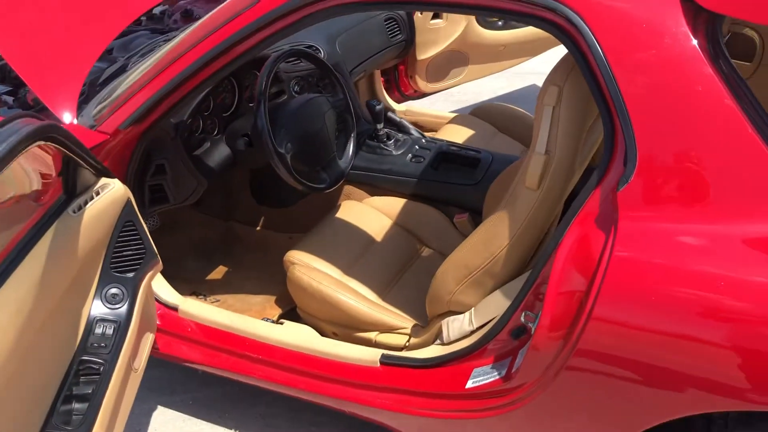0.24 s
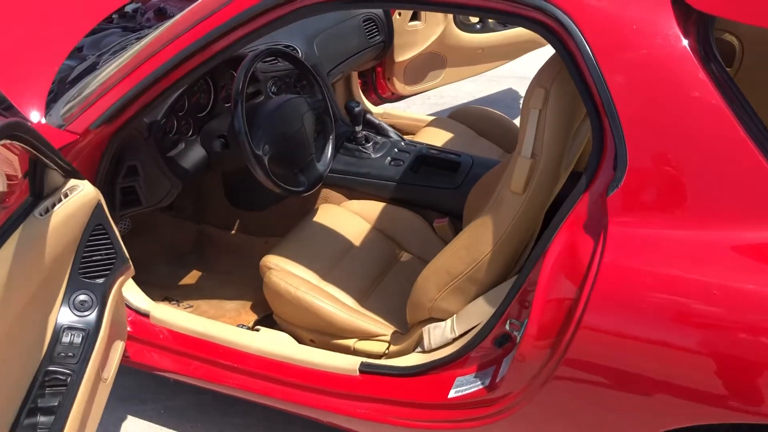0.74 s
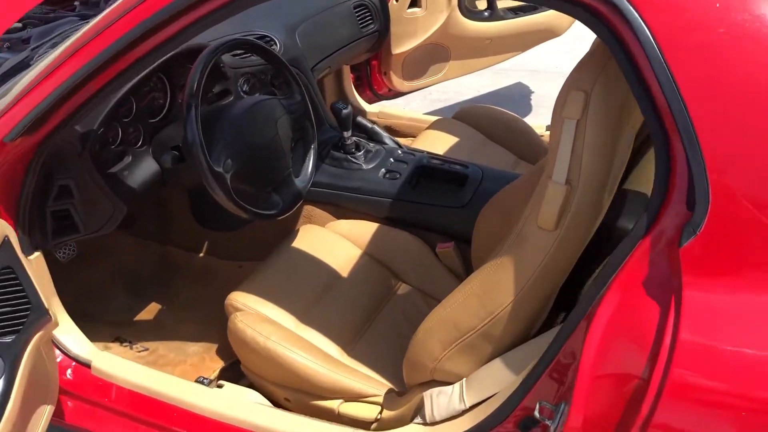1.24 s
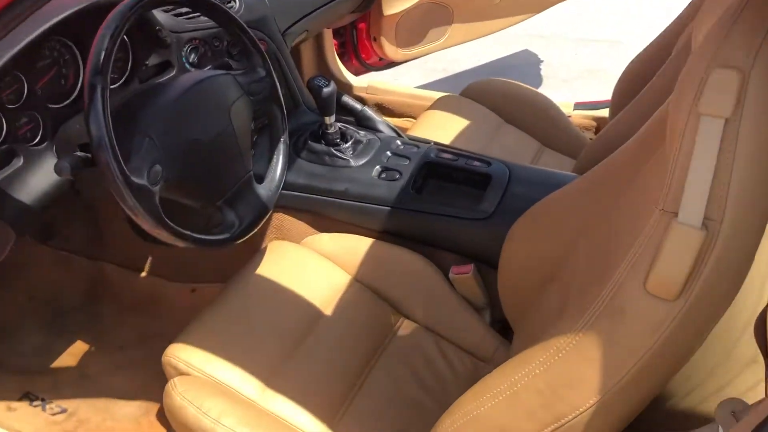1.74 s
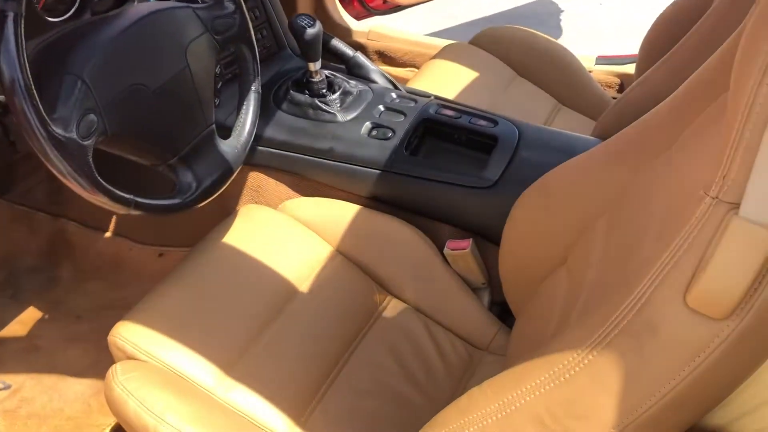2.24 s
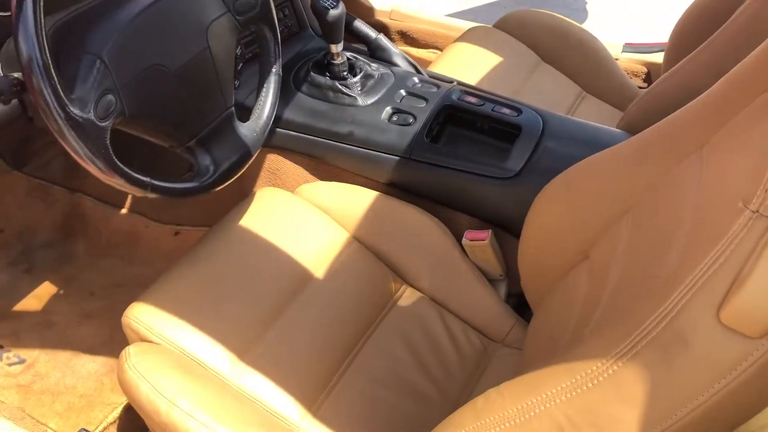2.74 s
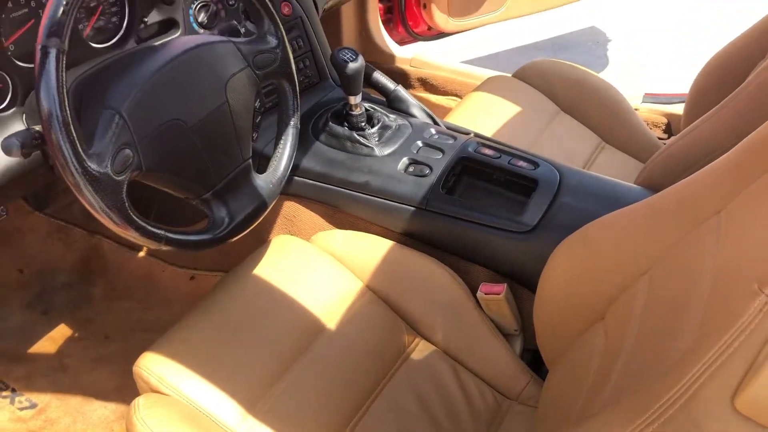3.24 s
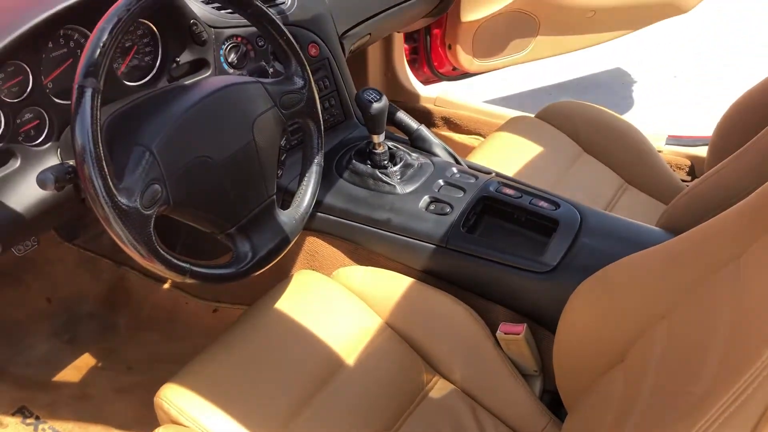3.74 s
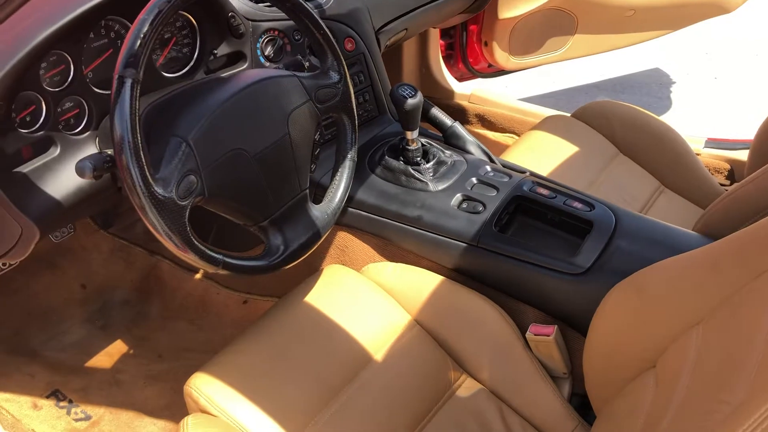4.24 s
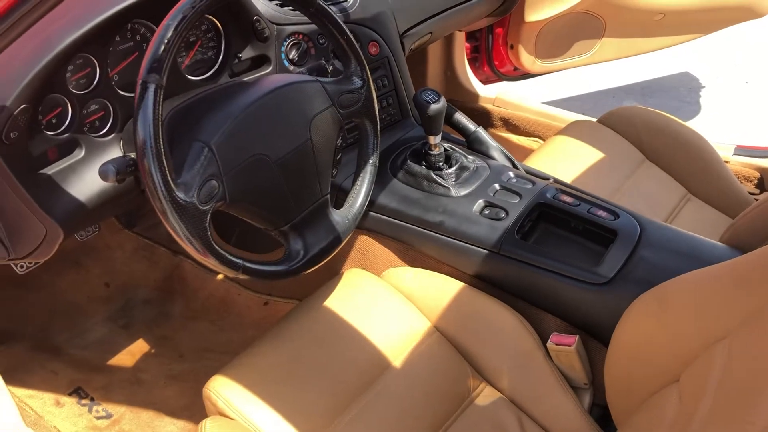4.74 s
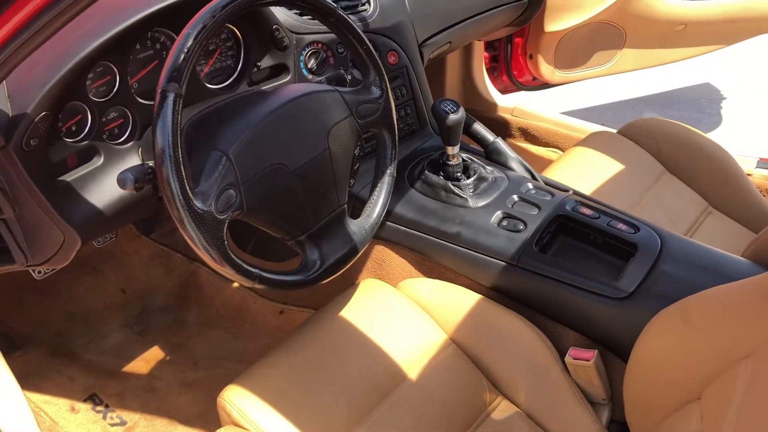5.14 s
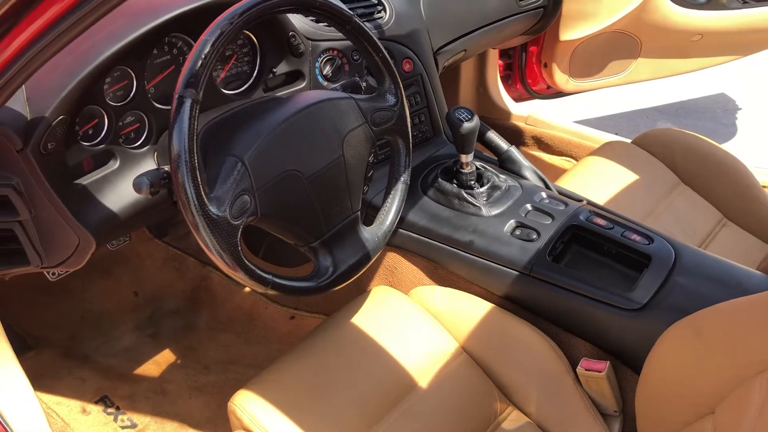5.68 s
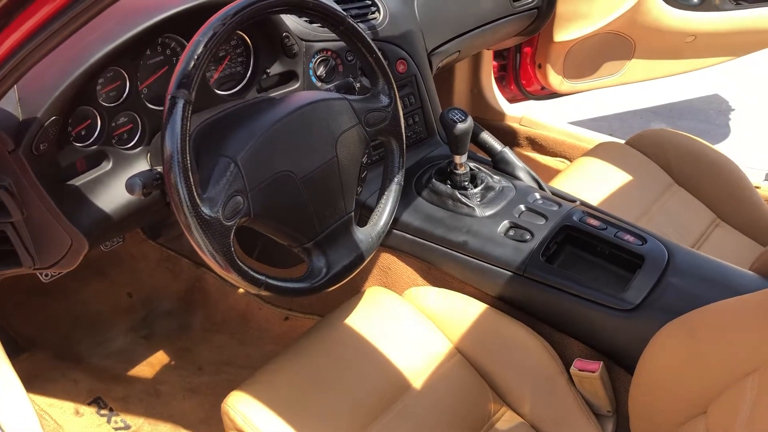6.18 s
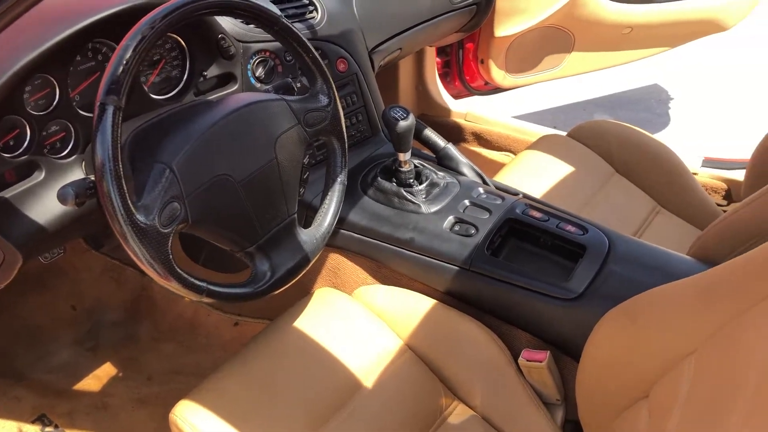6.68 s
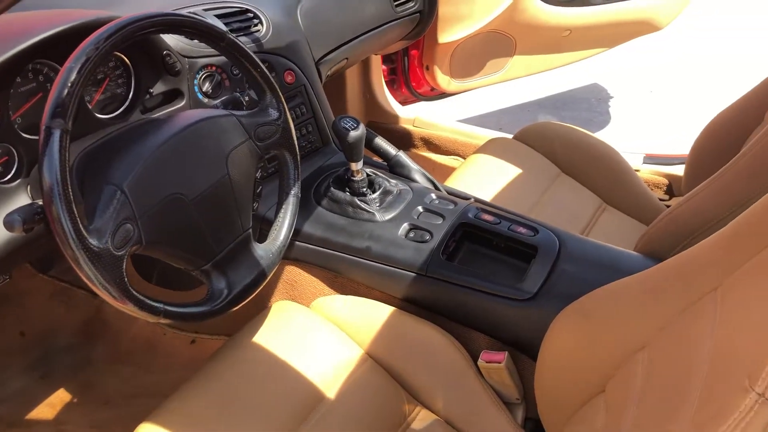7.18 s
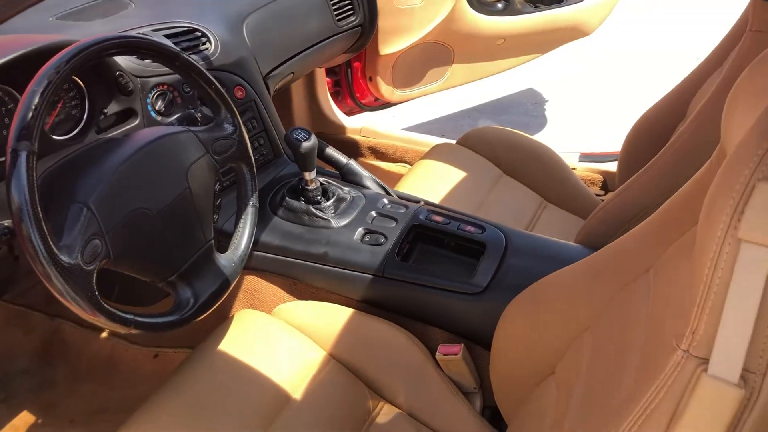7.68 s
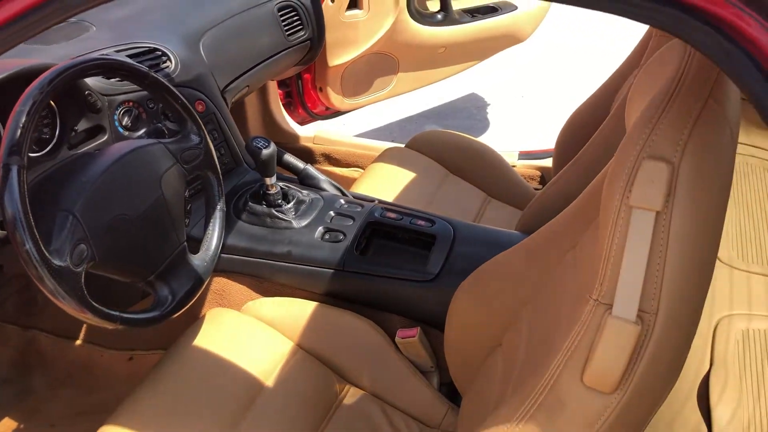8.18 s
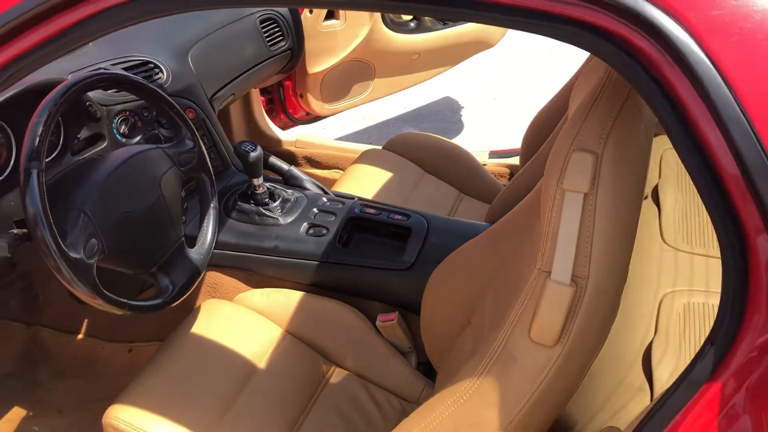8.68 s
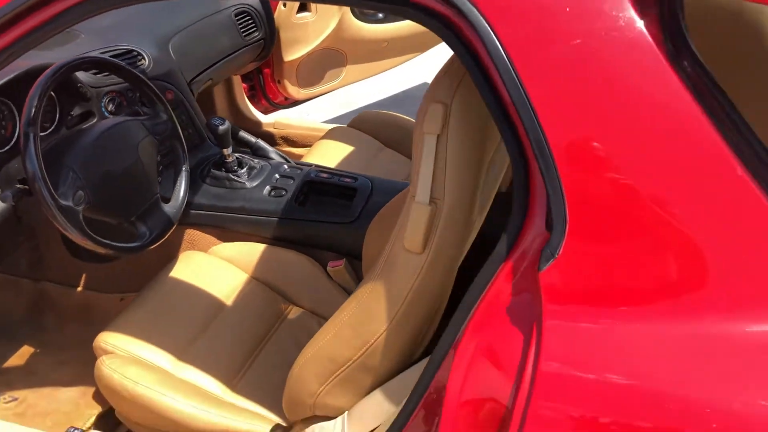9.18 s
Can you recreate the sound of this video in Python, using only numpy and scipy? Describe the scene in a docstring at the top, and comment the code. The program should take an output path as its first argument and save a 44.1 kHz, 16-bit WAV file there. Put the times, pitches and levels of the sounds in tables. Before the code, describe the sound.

A sports car engine idles with a steady low drone, heard at the open door and inside, with soft handling knocks.

```python
"""A two-rotor car engine idles throughout, heard at the open driver's door: exhaust pulses drone,
the engine bay whirrs, injectors tick, a fuel pump whines faintly. Cloth swishes and soft handling
knocks begin at once. A far bird chirps three times from 1.1 s, as the listener leans into the cabin:
more boom, less hiss. The knocks peak near 3.2 s. From 7.9 s the listener backs out, cloth swishes
again and the pump's whine swells at 9 s."""
import sys
import numpy as np
from scipy import signal
from scipy.fft import rfft, irfft
from scipy.io import wavfile

SR = 44100
rng = np.random.default_rng(int(sys.argv[2]) if len(sys.argv) > 2 else 0)


def wav_record(signal):
    """Record a signal, one row per channel, as 16-bit PCM in the file named by sys.argv[1]."""
    frames = np.transpose(np.atleast_2d(signal))
    bounded = np.clip(frames, -1, 1)
    # unit amplitude maps onto the largest positive 16-bit level
    quanta = np.round(bounded * 32767).astype(np.int16)
    wavfile.write(sys.argv[1], SR, quanta)


N = 415422
T = np.arange(N) / SR

# listener's path: time_s, position (0 in the cabin, 1 outside)
POSITION = [(0, 0.89), (1.2, 0.83), (2.15, .12), (3.3, 0), (7.9, .03), (8.5, .38), (9.42, 0.59)]


def amp(db):
    """Decibels to gain."""
    return 10 ** (np.asarray(db) / 20)


def unit(x):
    """Scale to rms 1."""
    return x / np.sqrt(np.mean(x ** 2) + 1e-20)


def curve(rows):
    """Linear track through (time_s, value) rows."""
    return np.interp(T, *np.transpose(rows))


def colour(spectrum, hz):
    """Gain at hz from (freq_hz, level_db) rows."""
    freq_hz, level_db = np.transpose(spectrum)
    return amp(np.interp(np.log(hz + 1), np.log(freq_hz), level_db))


def noise(spectrum):
    """Coloured noise, rms 1, rolled off past the table's ends."""
    hz = np.fft.rfftfreq(N, 1 / SR)
    low_pass = 1 / (1 + (hz / spectrum[-1][0] / 2) ** 4)
    high_pass = hz / (hz + spectrum[0][0] / 2)
    return unit(irfft(rfft(rng.standard_normal(N)) * colour(spectrum, hz) * low_pass * high_pass, N))


def resonate(x, hz, width_hz):
    """Movable resonance, rms 1: shift to 0 Hz, smooth twice, shift back."""
    phase = 2 * np.pi * np.cumsum(hz * np.ones(len(x))) / SR
    carrier = np.exp(1j * phase)
    pole = np.exp(-np.pi * width_hz * np.sqrt(2) / SR)
    smoothed = signal.lfilter([1], [1, -2 * pole, pole * pole], x * carrier.conj())
    return unit((carrier * smoothed).real)


def wander(rate_hz):
    """Smooth random drift, rms 1."""
    size = 4096
    hz = np.fft.rfftfreq(size, N / SR / size)
    slow = irfft(rfft(rng.standard_normal(size)) * np.exp(-(hz / rate_hz) ** 2), size)
    return np.interp(T, np.linspace(0, N / SR, size), unit(slow))


def add(mix, start_s, sound):
    """Mix a sound in at start_s."""
    part = mix[max(round(start_s * SR), 0):][:len(sound)]
    part += sound[:len(part)]


def level(inside_db, outside_change_db):
    """Gain along the listener's path."""
    return amp(inside_db + outside_change_db * curve(POSITION))


def reflections(x, count=14, echo_gain=0.072, longest_s=.014):
    """Early echoes off glass, door and ground ripple the treble."""
    delays = ((.001 + rng.random(count) * longest_s) * SR).astype(int)
    echoes = sum((-1) ** k * np.pad(x, (delay, 0))[:N] for k, delay in enumerate(delays))
    return (x + echo_gain * echoes) / np.sqrt(1 + count * echo_gain ** 2)


def bird(blur=0.18):
    """Far calls, blurred on the way: a falling whistle, then a short arched note."""
    # calls: start_s, level_db
    calls = [(1.125, -60), (1.31, -61), (1.542, -58)]
    # pitch track of each note: offset_s, pitch_hz
    notes = [
        [(0, 3130), (.028, 2960), (.05, 2680), (.08, 2480)],
        [(.076, 3220), (.095, 3400), (.12, 3130)],
    ]
    out = np.zeros(N)
    for start_s, level_db in calls:
        for note in notes:
            offset_s, pitch_hz = np.transpose(note)
            t = np.arange(offset_s[0], offset_s[-1], 1 / SR)
            phase = 2 * np.pi * np.cumsum(np.interp(t, offset_s, pitch_hz)) / SR
            whistle = unit(np.sin(phase)) * signal.windows.tukey(len(t), .5)
            add(out, start_s + offset_s[0], amp(level_db) * whistle)
    return out * (1 + blur * wander(rate_hz=90))


def swishes():
    """Sliding cloth; its colour glides with the speed of the rub."""
    # rubs: start_s, length_s, level_db, start_hz, end_hz, width_hz
    rubs = [(0.009, 0.042, -45.5, 4960, 3980, 4480), (8.77, 0.095, -52, 8000, 5000, 3800),
            (8.81, 0.059, -50.5, 3500, 3400, 450), (9.196, 0.096, -51, 3200, 4000, 4500)]
    out = np.zeros(N)
    for start_s, length_s, level_db, start_hz, end_hz, width_hz in rubs:
        size = int(length_s * SR)
        rub = resonate(rng.standard_normal(size), np.linspace(start_hz, end_hz, size), width_hz)
        add(out, start_s, amp(level_db) * rub * np.hanning(size))
    return out


def grip_shifts(rate_hz=1.5, level_db=-33.5, spread_db=1, hardness_db=-15):
    """Faint random bumps of the grip, as rows for knocks()."""
    draws = rng.random((int(rate_hz * N / SR), 2))
    return [(when * N / SR, level_db + spread_db * (2 * force - 1), hardness_db) for when, force in draws]


def knocks(thud_db=-1, push_db=-8, casing_db=-1, cutoff_hz=800):
    """Soft blows give a thud and a deep push; harder ones ring the casing more."""
    # handling blows: start_s, level_db, hardness_db
    blows = [(0.002, -14.5, -28), (0.027, -18.5, -17), (0.094, -25, -26), (0.467, -22.5, -5),
             (0.477, -14.5, -14), (0.56, -31, -5), (1.537, -23, -17), (1.786, -23.5, -20),
             (1.81, -24.5, -16.5), (2.052, -32, -9), (2.126, -24, -16), (2.139, -33, -7),
             (2.378, -19.5, -24), (2.845, -22.5, -19), (2.868, -25.5, -9.5), (2.882, -25.5, -14),
             (3.15, -18, -18), (3.186, -27.5, -0.5), (3.192, -15, -12), (3.211, -22, -14.5),
             (3.229, -13, -11.5), (3.277, -29, -8), (3.308, -19, -14), (4.453, -20, -23), (4.543, -24, -18),
             (4.733, -22.5, -17.5), (5.917, -21.5, -14), (5.96, -21.5, -14), (6.265, -23.5, -17),
             (6.293, -22.5, -18), (6.696, -29, -9), (6.725, -22.5, -19), (7.122, -21.5, -25),
             (7.369, -22.5, -25.5), (8.526, -26.5, -26), (8.692, -25.5, -16.5), (8.937, -25.5, -12)]
    # casing modes: pitch_hz, level_db, decay_s
    modes = [(275.5, 8, 0.0037), (408, 5.5, 0.0027), (596, -0.5, 0.0015)]
    out = np.zeros(N)
    t = np.arange(SR // 10) / SR

    def ring(hz, decay_s):
        """Damped tone, soft onset."""
        return t / decay_s * np.exp(1 - t / decay_s) * np.sin(2 * np.pi * hz * t)

    thud = amp(thud_db) * ring(hz=175, decay_s=0.0036)
    push = amp(push_db) * ring(hz=118, decay_s=0.0041)
    for start_s, level_db, hardness_db in blows + grip_shifts():
        detunes = 1 + 0.1 * rng.standard_normal(len(modes))  # the grip shifts the modes
        casing = sum(amp(db) * ring(hz * detune, decay_s)
                     for (hz, db, decay_s), detune in zip(modes, detunes))
        knock = thud + push + amp(hardness_db + casing_db) * casing
        add(out, start_s - .001, amp(level_db) * knock)
    # soft fingers excite no treble
    return signal.sosfilt(signal.butter(4, cutoff_hz, fs=SR, output="sos"), out)


def fuel_pump(waver=0.0007, flutter_db=1.2, swell_at_s=9.02, swell_half_s=.085):
    """Thin whine of a small electric motor, swelling once."""
    # motor tones: pitch_hz, relative_db
    tones = [(2320, -5), (2680, -13)]
    clock_s = np.cumsum(1 + waver * wander(rate_hz=10.4)) / SR
    whine = unit(sum(amp(db) * np.sin(2 * np.pi * hz * clock_s) for hz, db in tones))
    swell = 1 + amp(16.5) / (1 + ((T - swell_at_s) / swell_half_s) ** 2)
    flutter = amp(flutter_db * wander(rate_hz=15))
    return whine * level(inside_db=-73, outside_change_db=-4) * swell * flutter


def burst(firings, start, rise, fall):
    """Envelope repeating every second firing; all times in firings."""
    age = (firings - start) % 2
    return (1 - np.exp(-age / rise)) * np.exp(-age / fall)


def injectors(firings, sway_db=0.9):
    """A high, soft tick every second firing, louder outside."""
    # injector modes: pitch_hz, width_hz, relative_db, lag_firings
    modes = [(9200, 1900, -70, 0.031), (10860, 600, -81, .1), (11800, 600, -76, 0.083),
             (13550, 450, -78, 0.12), (14900, 600, -80, 0.1)]
    gain = level(inside_db=-1, outside_change_db=6.5) * amp(sway_db * wander(rate_hz=7.5))
    grit = rng.standard_normal(N)
    ticks = np.zeros(N)
    for pitch_hz, width_hz, relative_db, lag_firings in modes:
        envelope = burst(firings, start=0.64 + lag_firings, rise=0.18, fall=0.2)
        ticks += amp(relative_db) * resonate(grit * envelope, pitch_hz, width_hz)
    return gain * reflections(ticks, echo_gain=0.18, longest_s=.01)


def belt_hum(firings, slip_cycles=0.13, sway_db=2.5):
    """Pulleys turn with the engine; their tones waver as the belt slips."""
    # pulley tones: cycles_per_firing, level_db
    tones = [(11.5, -60), (17.5, -60.5), (25, -61.5)]
    out = np.zeros(N)
    for cycles_per_firing, level_db in tones:
        gain = amp(level_db + sway_db * wander(rate_hz=1.7))
        cycles = cycles_per_firing * firings + slip_cycles * wander(rate_hz=15)
        out += gain * unit(np.sin(2 * np.pi * cycles))
    return out


def engine_bay(firings, whirr_sway_db=0.57, throb_db=1.4, flicker_db=0.84, outside_share=0.87):
    """Belts and fans whirr, panels resonate, the intake hiss throbs with each firing."""
    # whirr spectrum: freq_hz, density_db
    whirr_spectrum = [(120, -31), (200, -6), (297, -6.5), (315, -14), (341, -10.5), (447, -6.5), (574, -5),
                      (621, -7), (696, -7.5), (753, -7), (1110, -6.5), (1930, -18), (2340, -21),
                      (3000, -28), (3900, -33.5), (6600, -120)]
    # engine cover and cabin modes: pitch_hz, width_hz, outside_db, inside_db
    modes = [(286.8, 42, -57, -54), (373, 53, -48, -73), (647, 13, -57, -61.5), (852, 59, -70, -59),
             (984, 100, -76, -58), (1351, 61, -61, -62), (1544, 194, -52, -62.5), (5760, 82, -70, -83),
             (5120, 210, -74, -83)]
    # intake spectrum: freq_hz, density_db
    hiss_spectrum = [(1500, -6), (2800, 1.5), (3700, 2.5), (4500, 1.5), (5400, 1), (7000, -2.5), (9000, -5),
                     (12000, -8), (14500, -11.5), (16000, -12)]
    whirr = noise(whirr_spectrum) * level(inside_db=-46, outside_change_db=2.16)
    whirr *= amp(whirr_sway_db * wander(rate_hz=18))
    panels = np.zeros(N)
    for pitch_hz, width_hz, outside_db, inside_db in modes:
        gain = level(inside_db, outside_share * (outside_db - inside_db))
        panels += gain * resonate(rng.standard_normal(N), pitch_hz, width_hz)
    throb = np.cos(2 * np.pi * (firings - .25))
    hiss = noise(hiss_spectrum) * level(inside_db=-59, outside_change_db=5.5)
    hiss *= amp(throb_db * throb + flicker_db * wander(rate_hz=32))
    return whirr + panels + reflections(hiss)


def dips_db():
    """Brief dips and swells in the drone's level."""
    # Gaussian level changes: centre_s, half_length_s, change_db
    dips = [(0.083, 0.22, -5.5), (0.344, 0.039, 2.5), (0.562, 0.11, -10.5), (2.878, 0.029, 4.5),
            (3.267, 0.018, -12)]
    return sum(db * np.exp(-((T - centre_s) / half_s) ** 2) for centre_s, half_s, db in dips)


def gas_flow(firings, gust_db=1, dip_share=0.2, puff_db=-55):
    """Exhaust turbulence rumbles, with a puff on the stronger rotor's stroke."""
    # turbulence spectrum: freq_hz, density_db
    spectrum = [(15, -26), (25, -18), (36, -26), (58, 4), (85, -7.5), (130, 1.5), (190, -9.5), (260, -17),
                (400, -26), (900, -48)]
    rumble = noise(spectrum) * level(inside_db=-42, outside_change_db=-1)
    rumble *= amp(dip_share * dips_db() + gust_db * wander(rate_hz=1.4))
    puffs = burst(firings, start=0.204, rise=0.11, fall=0.27) * rng.standard_normal(N)
    return rumble + amp(puff_db) * resonate(puffs, hz=265, width_hz=95)


def rotor_pulses(firings, port_firings=0.4873, lead_firings=0.0082, jitter_firings=.004,
                 imbalance=0.085, roughness=.1):
    """One pulse as each port opens; two rotors alternate, one stronger and earlier."""
    index = np.arange(int(firings[-1]))
    rotor = (-1) ** index
    timing, strength = rng.standard_normal((len(index), 2)).T
    openings = index + port_firings - lead_firings * rotor + jitter_firings * timing
    samples = np.searchsorted(firings, openings).clip(0, N - 1)
    pulses = np.zeros(N)
    pulses[samples] = -(1 + imbalance * rotor + roughness * strength)
    return pulses


def exhaust(firings, cutoff_hz=900, split_hz=92, body_sway_db=0.56, body_dip_share=0.65):
    """Rotor pulses ring the pipe; the cabin lifts the deepest band most."""
    # pipe response: freq_hz, gain_db
    pipe = [(25, -64), (40, -21.5), (51, 1.5), (77, 5.5), (102, -6), (128, -7.5), (153, -12.5), (180, -27),
            (215, -51), (290, -32.5), (400, -50.5), (800, -84.5)]
    size = 2 ** 15
    log_gain = np.log(colour(pipe, abs(np.fft.fftfreq(size, 1 / SR))))
    minimum_phase = np.exp(np.conj(signal.hilbert(log_gain)))
    ring = np.fft.ifft(minimum_phase).real[:size // 2]
    drone = signal.fftconvolve(rotor_pulses(firings), ring)[:N]
    drone = signal.sosfilt(signal.butter(2, cutoff_hz, fs=SR, output="sos"), drone)
    deep = signal.sosfiltfilt(signal.butter(4, split_hz, fs=SR, output="sos"), drone)
    boom_sway_db = 0.27 + 2.5 * curve(POSITION)
    boom = unit(deep) * level(inside_db=-28, outside_change_db=-6.5)
    boom *= amp(dips_db() + boom_sway_db * wander(rate_hz=16))
    body = unit(drone - deep) * level(inside_db=-31.5, outside_change_db=-0.5)
    body *= amp(body_dip_share * dips_db() + body_sway_db * wander(rate_hz=15))
    return boom + body


def scene():
    """Mono mix; one running count of firings times the engine."""
    # slightly hunting idle: time_s, firing_rate_hz
    idle = [(0.0, 25.76), (1.58, 25.29), (1.68, 25.66), (2.51, 26.02), (3.0, 24.99), (3.19, 25.38),
            (4.21, 25.61), (4.49, 25.99), (5.24, 25.26), (5.82, 25.55), (5.95, 25.88), (6.95, 25.32),
            (7.8, 25.45), (8.08, 25.67), (8.65, 25.34), (9.42, 25.99)]
    firings = np.cumsum(curve(idle)) / SR
    engine = exhaust(firings) + gas_flow(firings) + engine_bay(firings)
    accessories = belt_hum(firings) + injectors(firings) + fuel_pump()
    return (engine + accessories + knocks() + swishes() + bird())[None]


def record(dry):
    """Steep low-pass on the top treble."""
    cutoff_hz = 15760
    taps = signal.firwin(1023, cutoff_hz, window=("kaiser", 9), fs=SR)
    return signal.oaconvolve(dry, taps[None], "same")


dry = scene()
out = record(dry)
wav_record(out)
```